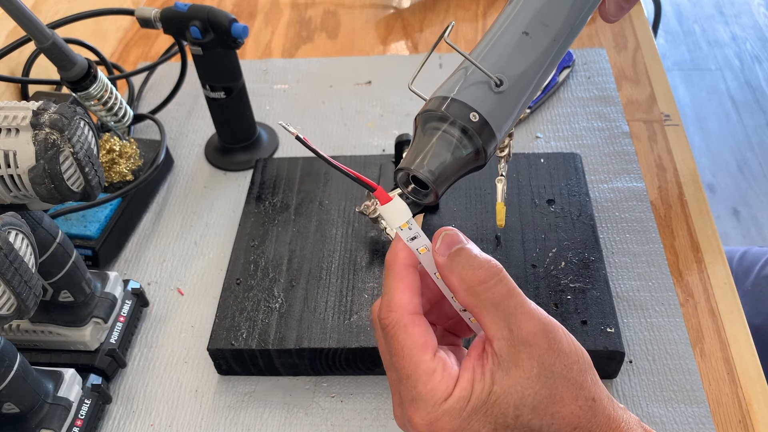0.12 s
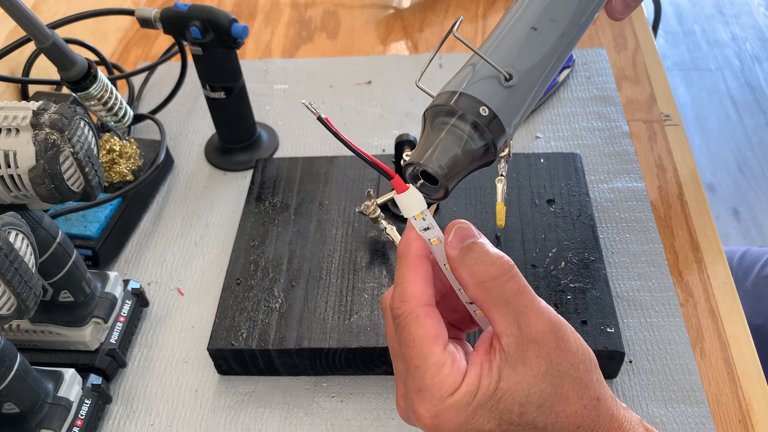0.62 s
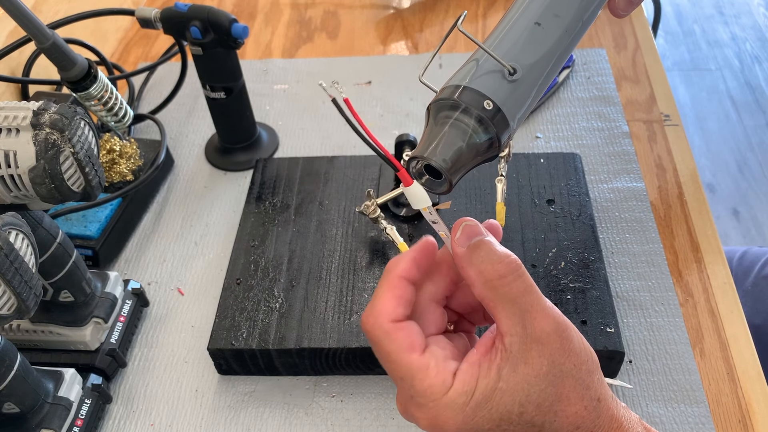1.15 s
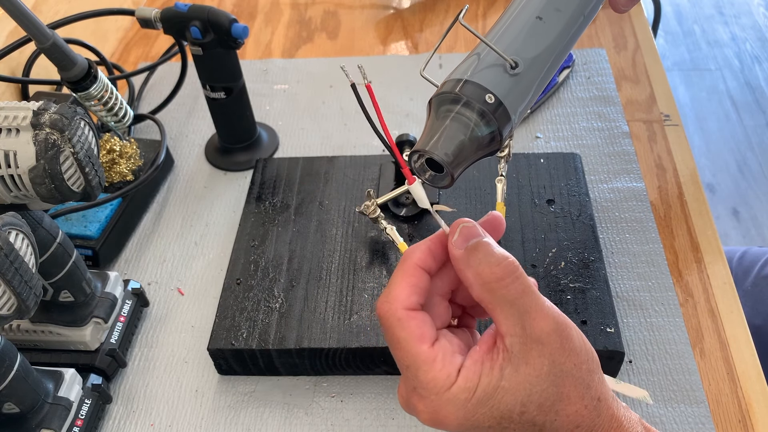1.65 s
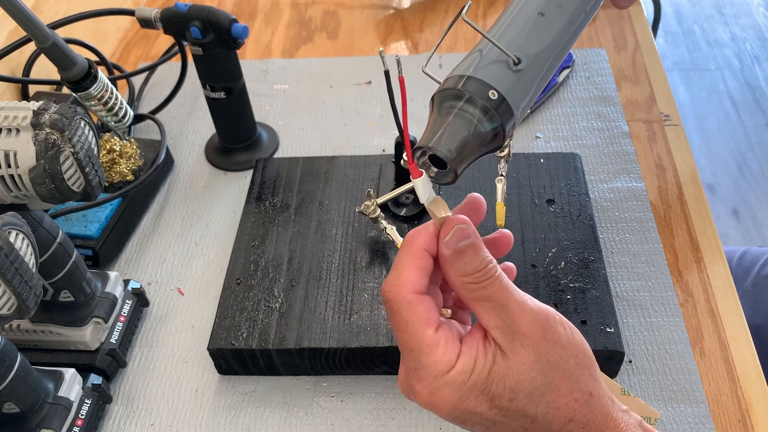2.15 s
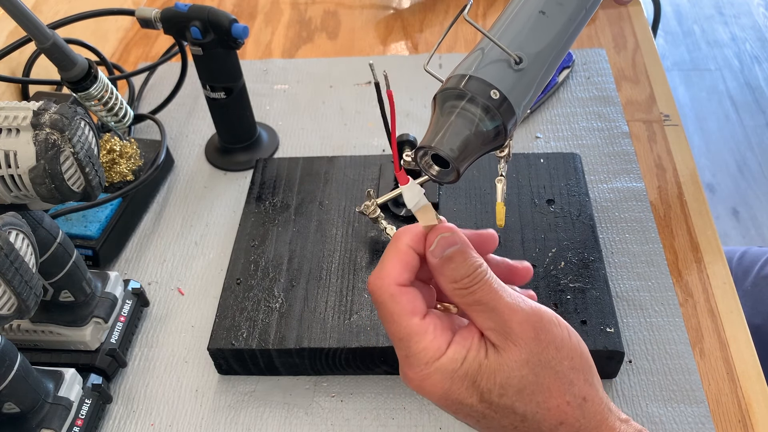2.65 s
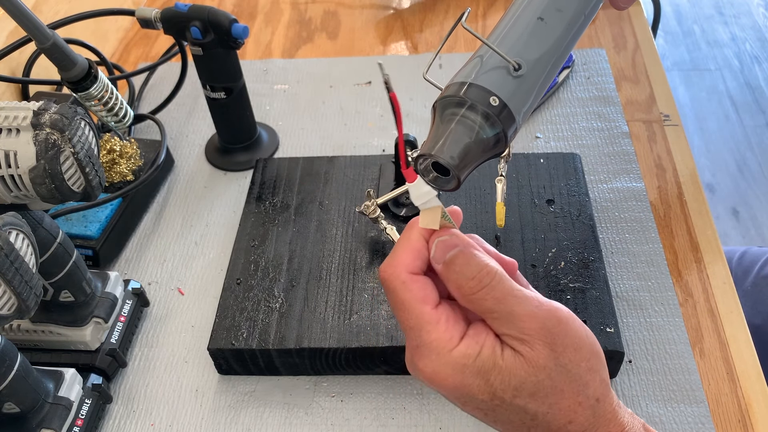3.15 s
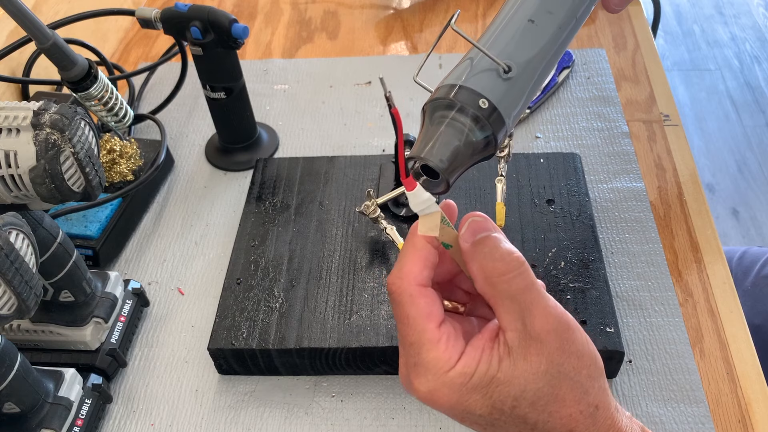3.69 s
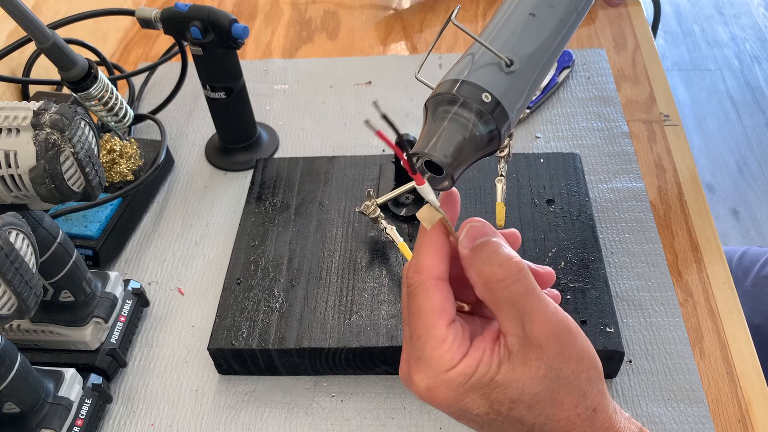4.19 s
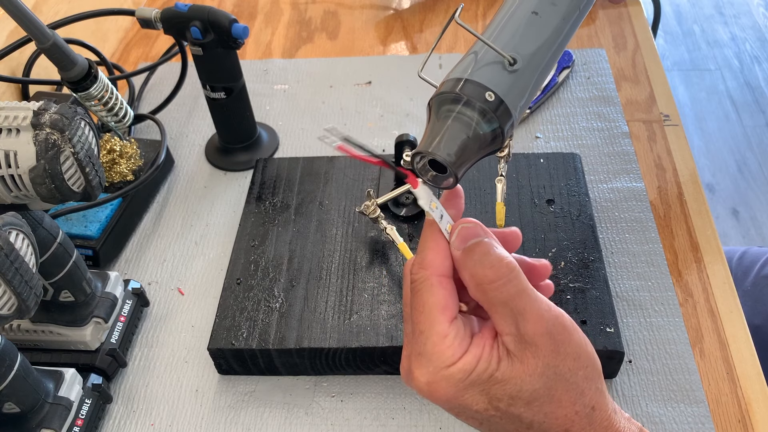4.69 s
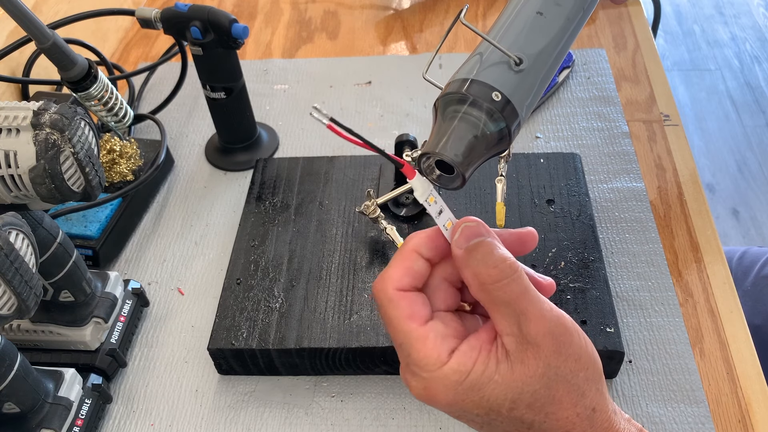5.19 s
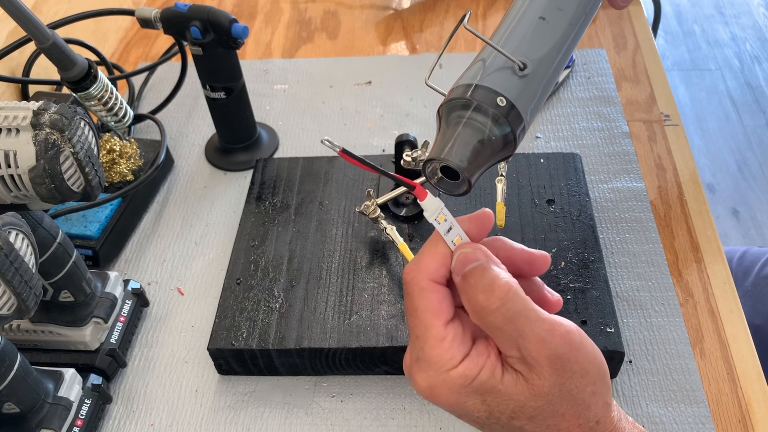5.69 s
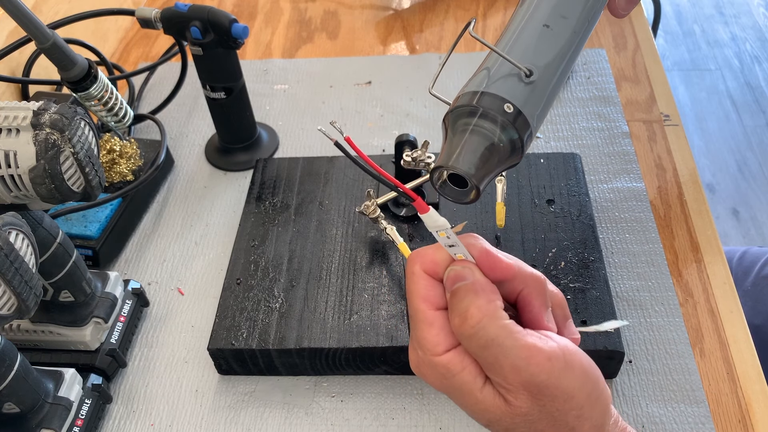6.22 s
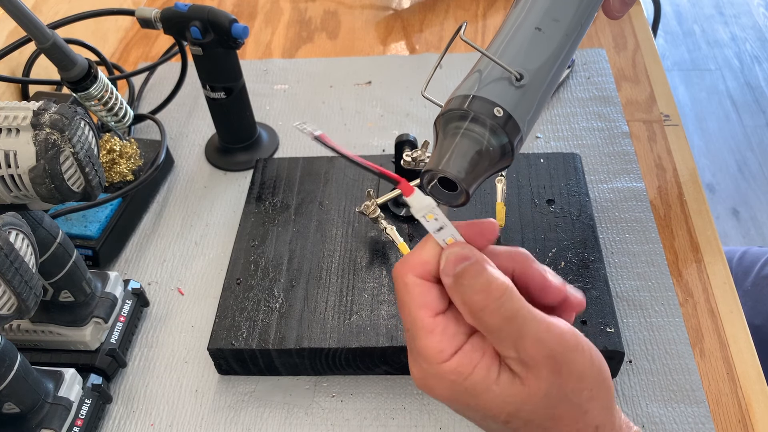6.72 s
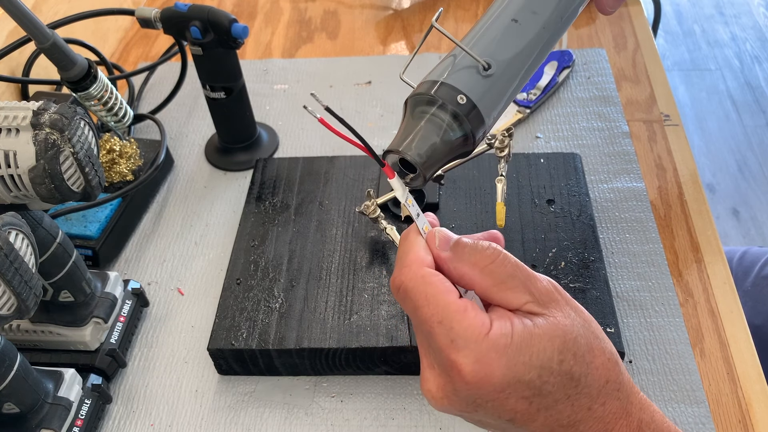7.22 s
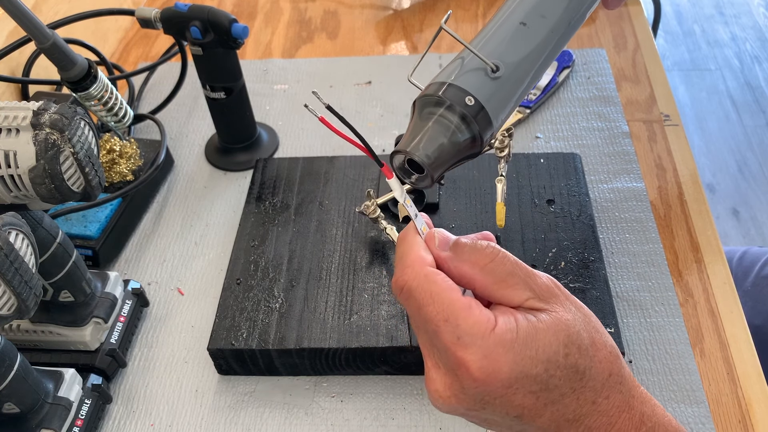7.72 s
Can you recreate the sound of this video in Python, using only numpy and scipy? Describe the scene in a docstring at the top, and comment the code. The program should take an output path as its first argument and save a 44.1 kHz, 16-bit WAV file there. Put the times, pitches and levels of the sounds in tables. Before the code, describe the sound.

From 0 seconds a small electric heat gun is already at full speed, close to a single microphone at an indoor workbench, and it runs without a break to the end near 7.9 seconds. A piercing, nearly fixed whine around 1.8 kHz stands out, with fainter overtones near 3.6, 5.5 and 7 kHz and above, and thin motor lines giving a slight electric buzz. Around it is a dense, breathy rush of air, strongest from about 700 Hz to 4 kHz, with airy hiss above and little bass; a barely audible mains hum lies beneath. For the first 2 seconds the whine is slightly softer; from about 2 to 5 it firms up and some overtones swell, then it stays a little stronger and brighter until the end. Pitch rises by only a hair. Sound is centred, with a short, dull room reflection.

```python
"""At a workbench, close to a single microphone, a small hot-air gun runs steadily.
A five-bladed fan whines at its blade rate, with overtones as sines on multiples of the shaft speed.
The brushed motor adds thin lines on further multiples; a faint mains hum lies beneath.
Air rushes through the barrel: noise coloured by the resonances of barrel, nozzle, bench and room."""
import sys
import numpy as np
from scipy import signal
from scipy.fft import rfft, irfft, next_fast_len
from scipy.io import wavfile

SR = 44100
rng = np.random.default_rng(int(sys.argv[2]) if len(sys.argv) > 2 else 0)


def pcm_store(signal):
    """Save signal as 16-bit PCM."""
    levels = np.round(np.clip(np.atleast_2d(signal), -1, 1) * 32767)
    wavfile.write(sys.argv[1], SR, levels.astype(np.int16).T)


def magnitude_from_level(level_db):
    """Linear magnitude for a level in decibels (20 dB per decade)."""
    exponent = np.asarray(level_db, float) / 20
    return 10 ** exponent


N = 346626

# fan overtones that swell and fade with the hold:
# (multiple of shaft speed [-], rms level [dB], gain per unit turn [dB], gain per unit tilt [dB])
FAN_OVERTONES = [(10, -48.5, -1, 0), (15, -54, -1.7, 4), (20, -50.5, 5, 0.5), (22, -62.5, -4, -3),
                 (23, -55, 3.5, .1), (24, -65, 4, -6), (25, -55, 1.2, -1), (28, -63.5, 9, 1.3),
                 (30, -63, 6, 4), (34, -65.5, 3.8, -1.3), (35, -65, -2.9, 3.9)]
# motor lines that do not follow the hold, each wandering on its own:
# (multiple of shaft speed [-], rms level [dB])
MOTOR_LINES = [(1, -73.5), (4, -58), (11, -74), (12, -58), (14, -71), (16, -77), (17, -64.5), (18, -67),
               (19, -71), (21, -72), (26, -69), (27, -69), (29, -69.1), (31, -63), (32, -77), (33, -74.6),
               (36, -72.1), (37, -71.5), (38, -76.3), (39, -76.6), (40, -78), (41, -72.5), (42, -79),
               (43, -79.2)]
# relative spectrum of the air stream: (frequency [Hz], density [dB per Hz])
AIR_SPECTRUM = [(15, -50), (25, -35), (60, -26), (120, -16.5), (280, -20), (450, -17), (700, -1),
                (1100, -9), (2000, -5), (4000, -12.5), (6500, -15.5), (9000, -13.5), (11500, -19),
                (15600, -20.7)]
# resonances and dips of barrel, nozzle and bench: (centre [Hz], width [Hz], gain [dB])
BARREL_RESONANCES = [(291, 50, -3.5), (349, 77, 4), (412, 35, 7), (440, 45, -5.5), (521, 31, 7),
                     (553, 24, 3), (620, 46, -2.5), (766, 81, 4), (827, 46, 2), (942, 81, 9), (994, 48, -2),
                     (1260, 170, 5.5), (1312, 37, -5), (1367, 104, 6), (1568, 116, 3.5), (1779, 221, 11),
                     (2432, 150, -5), (2645, 456, 11), (3575, 500, 8.5), (4400, 114, 4), (4590, 270, 5),
                     (5310, 600, 4.5), (7100, 520, 5), (7630, 370, -4), (7920, 140, 6), (9140, 430, 3.5),
                     (9883, 486, 2.5), (11290, 169, 1)]
# resonances and dips of the room in the bass: (centre [Hz], width [Hz], gain [dB])
ROOM_RESONANCES = [(101, 40, 1.5), (142, 21, -8.5), (217, 29, 2.5)]
# the motor speeds up a little as it warms: (time [s], shaft speed [turns per s])
SHAFT_SPEED = [(0.0, 363.5), (0.4, 363.45), (0.7, 363.32), (1.4, 363.23), (2.0, 363.56), (2.6, 363.52),
               (2.9, 363.42), (3.3, 363.75), (4.6, 363.64), (5.3, 364.06), (5.8, 364.4), (6.2, 364.04),
               (6.8, 364.32), (7.2, 364.25), (7.5, 364.47), (7.86, 364.52)]
# two slow movements of the hand that holds the gun: (time [s], turn [-1..1], tilt [-1..1])
HAND_HOLD = [(0.0, -.85, 0.39), (1.0, -1, .2), (1.7, -.9, 0.078), (2.2, -0.087, -.7), (2.7, -0.07, -0.55),
             (3.1, -.2, -.3), (3.4, 0.2, -0.47), (3.8, -0.26, .1), (4.1, 0.2, -0.2), (4.5, 0.23, -0.71),
             (5.0, 0.91, -.5), (5.4, .6, -0.3), (6.0, .6, 0.3), (6.6, 0.16, 1), (7.0, .2, 1),
             (7.4, 0.85, 1), (7.86, 0.69, 0.41)]

BLADES = 5
# blade tone: level, gain per unit of turn and of tilt, depth of its slow random sway
WHINE_DB, WHINE_TURN_DB, WHINE_TILT_DB, WHINE_SWAY_DB = -33, 1.5, 0.7, 0.42
RIPPLE_HZ, HUM_DB = 120, -76
# air stream: level, then hiss gain per unit of turn and of tilt
RUSH_DB, HISS_TURN_DB, HISS_TILT_DB = -37, 0.3, 0.3
ECHO_DB, ECHO_T60_S, ECHO_CUT_HZ = -11, 0.3, 3000


def in_time(rows):
    """Linear interpolation: each column of a time table becomes one value per sample."""
    time_s, *columns = np.transpose(rows)
    return [np.interp(np.arange(N) / SR, time_s, column) for column in columns]


def drift(rate_hz):
    """Low-passed white noise: a slow random walk about zero, two equal poles at rate_hz, spread 1."""
    pole = np.exp(-2 * np.pi * rate_hz * 40 / SR)   # computed on every 40th sample
    noise = rng.standard_normal(N // 40 + 2002)
    slow = signal.lfilter([1], [1, -2 * pole, pole * pole], noise)[2000:]   # settled part
    return np.interp(np.arange(N) / 40, np.arange(len(slow)), slow / slow.std())


def line(turns, order, level_db):
    """Harmonic of rotation: a sine of given rms level at a multiple of the turning rate."""
    phase = order * turns + rng.random()
    return np.sqrt(2) * magnitude_from_level(level_db) * np.sin(2 * np.pi * phase)


def shaft_turns():
    """Phase is the integral of speed: turns made, with a slight tremble and a shake by the supply."""
    speed, = in_time(SHAFT_SPEED)
    turns = np.cumsum(speed + 0.05 * drift(10)) / SR
    # in step with the level ripple, the shake strengthens the side lines above the thin tones
    return turns + 0.0015 * np.sin(2 * np.pi * RIPPLE_HZ * np.arange(N) / SR)


def fan(turns, waver_db):
    """Blade-passing tone and overtones of the rotation; turbulence at the blades makes them waver."""
    turn, tilt = in_time(HAND_HOLD)
    whine_db = WHINE_DB + WHINE_TURN_DB * turn + WHINE_TILT_DB * tilt
    whine_db = whine_db + 0.29 * waver_db * drift(25) + WHINE_SWAY_DB * drift(2.4)
    whine = line(turns, BLADES, whine_db)
    overtones = np.zeros(N)
    for order, db, turn_db, tilt_db in FAN_OVERTONES:
        level_db = db + turn_db * turn + tilt_db * tilt + waver_db * drift(6.2)
        overtones += line(turns, round(order), level_db)
    return whine, overtones


def motor(turns, waver_db):
    """Shaft-order excitation: bearing and brush lines, each wandering in level on its own."""
    return sum(line(turns, round(order), db + waver_db * drift(0.87)) for order, db in MOTOR_LINES)


def ripple(depth):
    """Amplitude modulation: the rectified mains supply swells at twice the mains rate."""
    return 1 + depth * np.cos(2 * np.pi * RIPPLE_HZ * np.arange(N) / SR)


def air(turns, brush_depth, ripple_depth, gust_db):
    """Filtered flow noise: resonances shape the stream; brushes and supply modulate its hiss."""
    size = next_fast_len(N)
    hz = np.fft.rfftfreq(size, 1 / SR) + 1   # the offset avoids zero frequency
    colour_hz, colour_db = np.transpose(AIR_SPECTRUM)
    shape_db = np.interp(np.log(hz), np.log(colour_hz), colour_db)
    for rows in (BARREL_RESONANCES, ROOM_RESONANCES):
        for centre, width, db in rows:
            shape_db = shape_db + db / (1 + (2 * (hz - centre) / width) ** 2)
    stream = rfft(rng.standard_normal(size)) * magnitude_from_level(shape_db) * room(size, hz)
    # unit rms between 400 and 1700 Hz, the band to which RUSH_DB refers
    stream /= irfft(stream * (hz > 400) * (hz < 1700), size).std()
    hiss_share = 1 / (1 + (6500 / hz) ** 4)
    body = irfft(stream * (1 - hiss_share), size)[:N]
    hiss = irfft(stream * hiss_share, size)[:N]
    pulse = 1 + brush_depth * (np.cos(2 * np.pi * turns) + 0.8 * np.cos(4 * np.pi * turns))
    turn, tilt = in_time(HAND_HOLD)
    hiss = hiss * pulse * ripple(ripple_depth) * magnitude_from_level(HISS_TURN_DB * turn + HISS_TILT_DB * tilt)
    return magnitude_from_level(RUSH_DB + gust_db * drift(8.1)) * (body + hiss)


def room(size, hz):
    """Reverberation as a frequency response: direct sound plus a dull, exponentially dying tail."""
    time_s = np.arange(SR // 2) / SR
    tail = rng.standard_normal(SR // 2) * magnitude_from_level(-60 * time_s / ECHO_T60_S)
    tail = magnitude_from_level(ECHO_DB) * tail / np.sqrt(np.sum(tail ** 2))   # energy before the treble loss
    return 1 + rfft(tail, size) / np.sqrt(1 + (hz / ECHO_CUT_HZ) ** 2)


def mains_hum():
    """Periodic excitation at twice the mains rate: one faint sine of slowly wandering level."""
    return line(np.arange(N) / SR, RIPPLE_HZ, HUM_DB + 2.0 * drift(2.2))


def scene():
    """Superposition: fan, motor, air and hum add linearly, alike in both channels."""
    turns = shaft_turns()
    whine, overtones = fan(turns, waver_db=1.2)
    thin = (overtones + motor(turns, waver_db=2.5)) * ripple(0.11)
    rush = air(turns, brush_depth=0.09, ripple_depth=0.024, gust_db=0.22)
    gun = whine + thin + rush + mains_hum()
    return np.array([gun, gun])


def top_cut(x):
    """Nothing passes above the cut-off."""
    return signal.sosfilt(signal.butter(12, 16310, fs=SR, output="sos"), x)


def record(dry):
    """Band limitation: a steep elliptic low-pass removes the top of the spectrum."""
    low_pass = signal.ellip(12, 0.2, 60, 15740, fs=SR, output="sos")   # ripple, stopband [dB]; edge [Hz]
    finished = signal.sosfilt(low_pass, dry)
    return top_cut(finished)


dry = scene()
out = record(dry)
pcm_store(out)
```